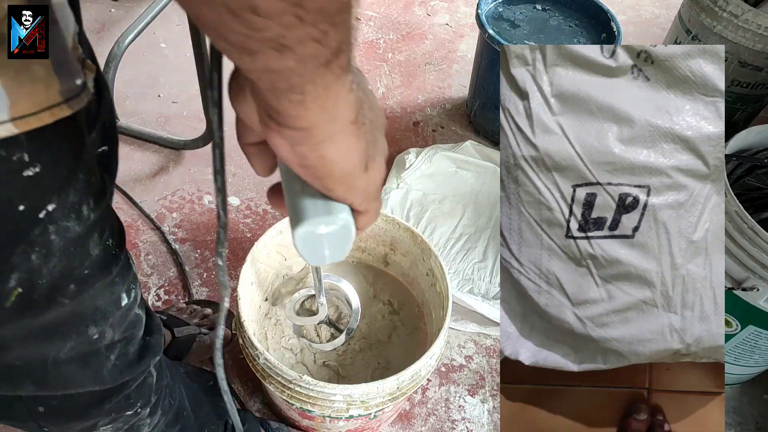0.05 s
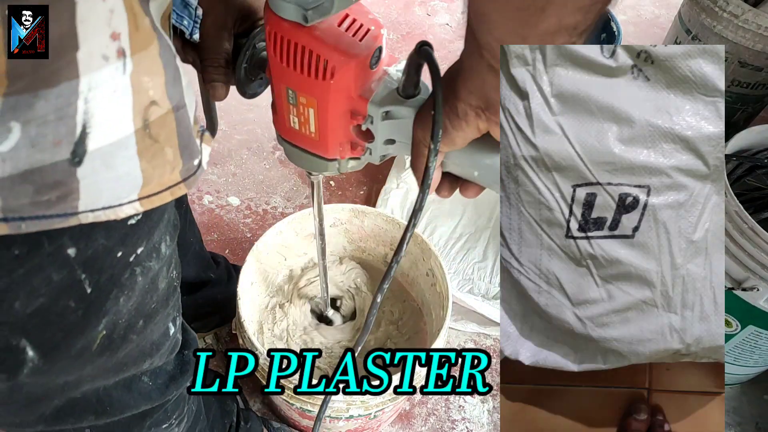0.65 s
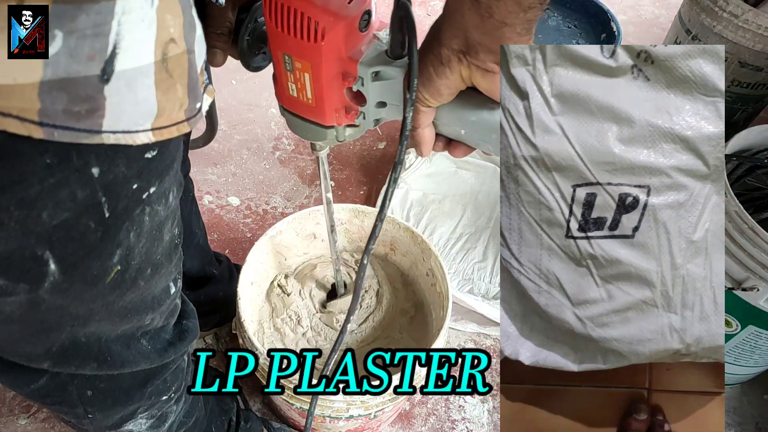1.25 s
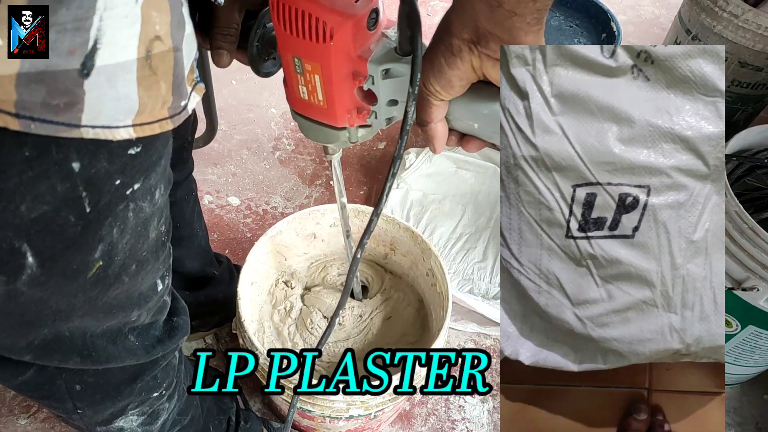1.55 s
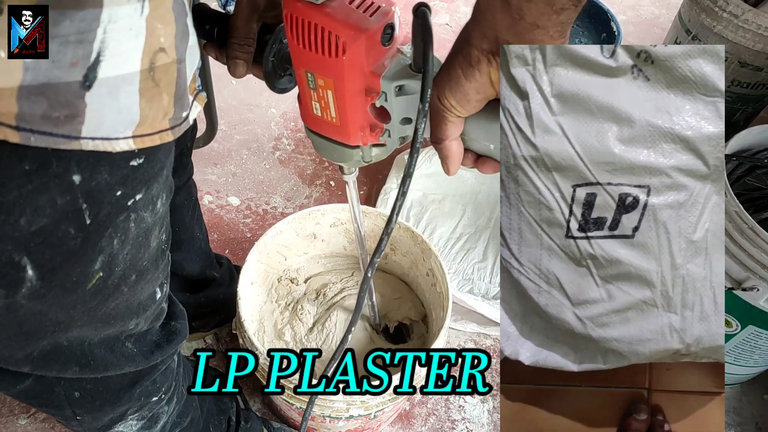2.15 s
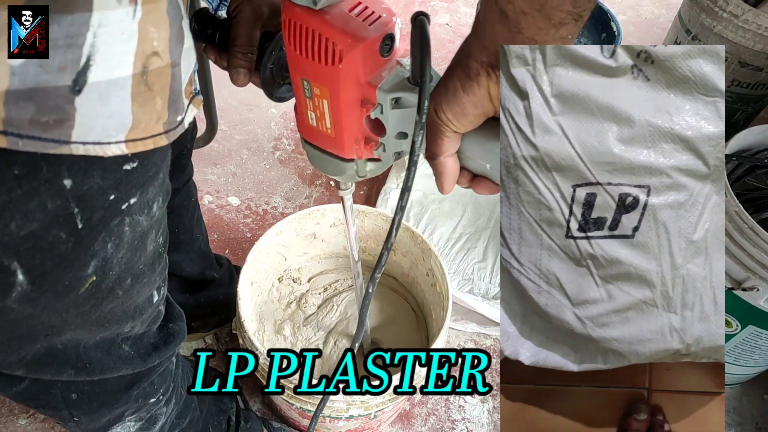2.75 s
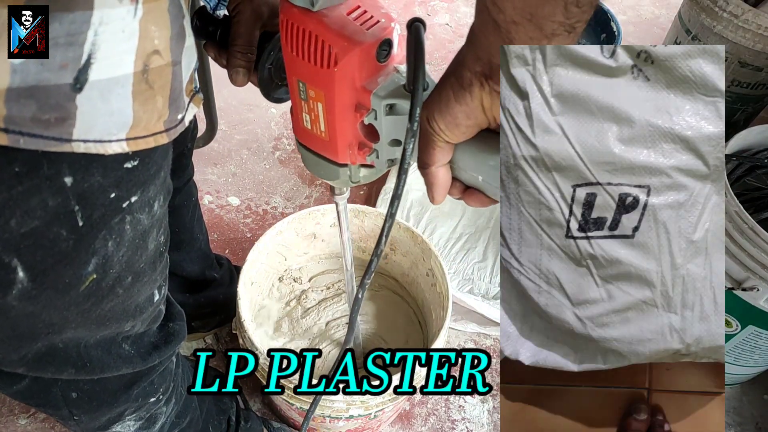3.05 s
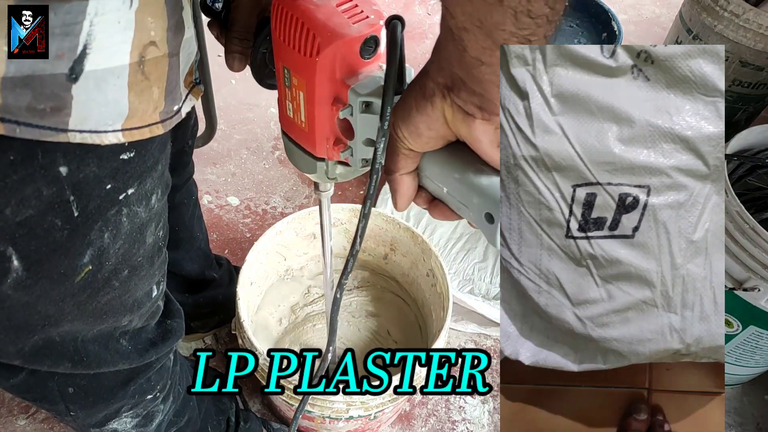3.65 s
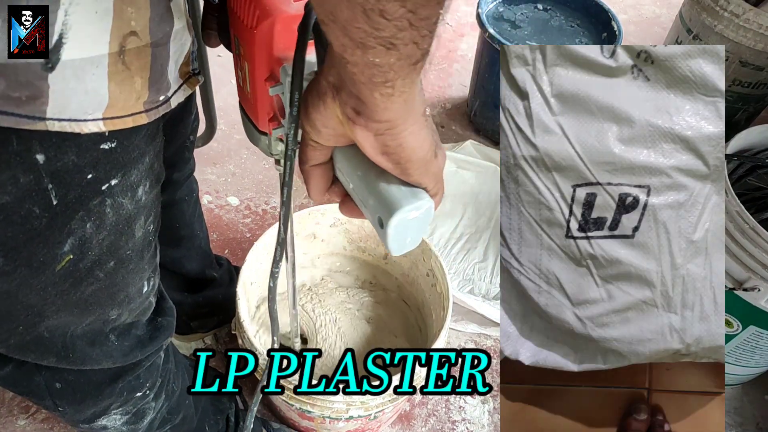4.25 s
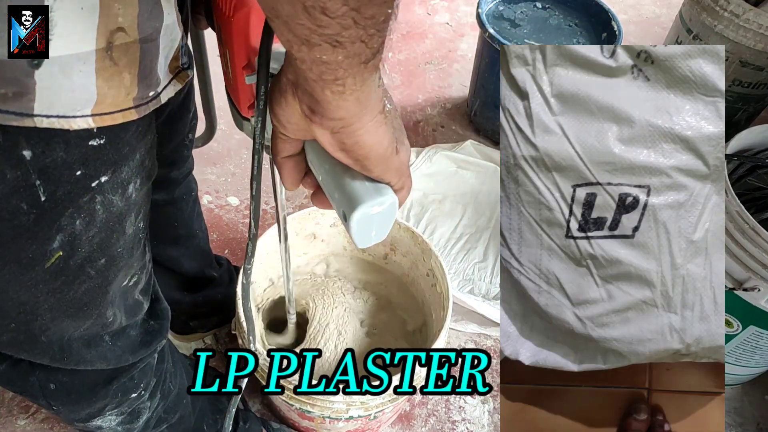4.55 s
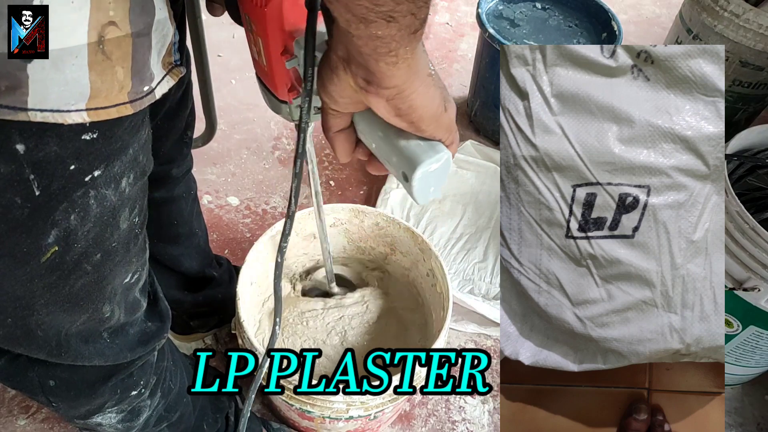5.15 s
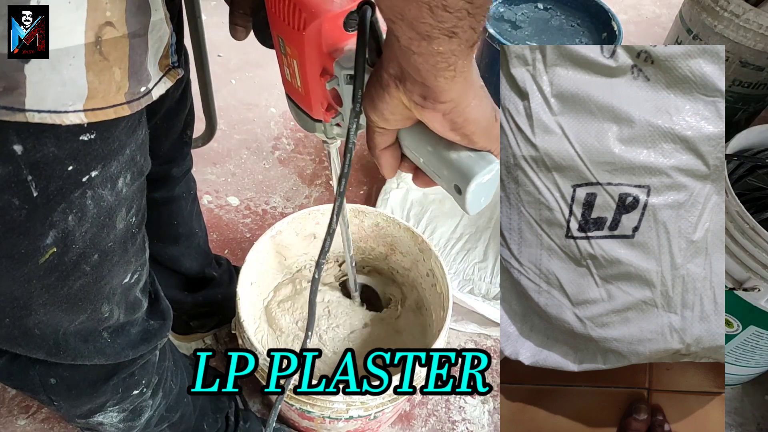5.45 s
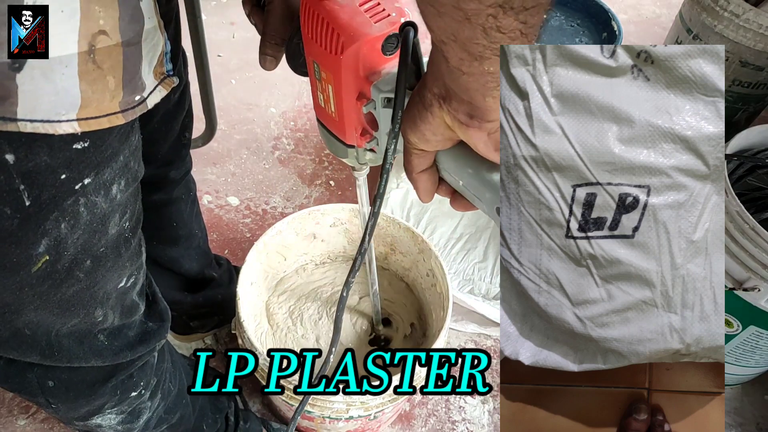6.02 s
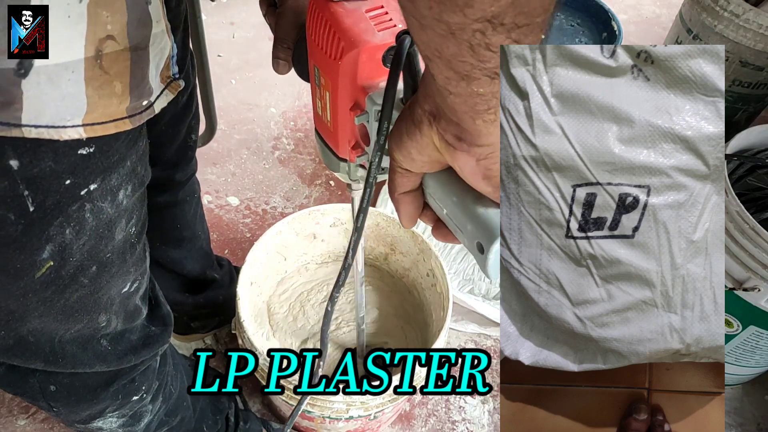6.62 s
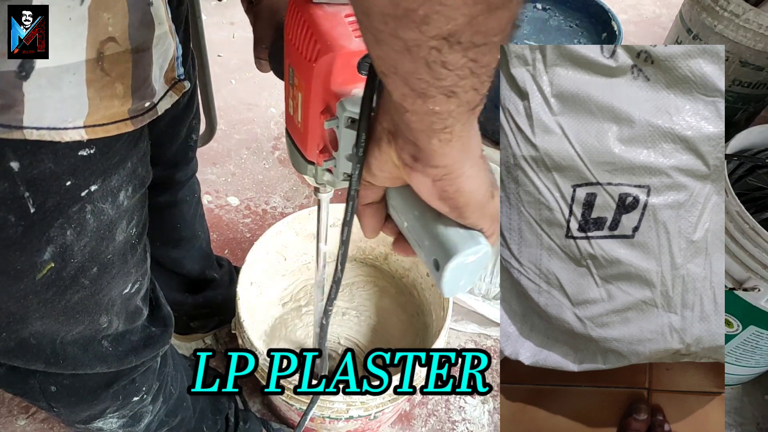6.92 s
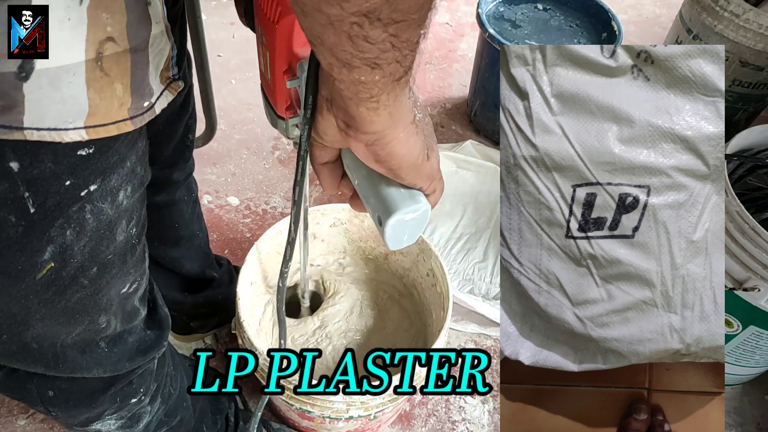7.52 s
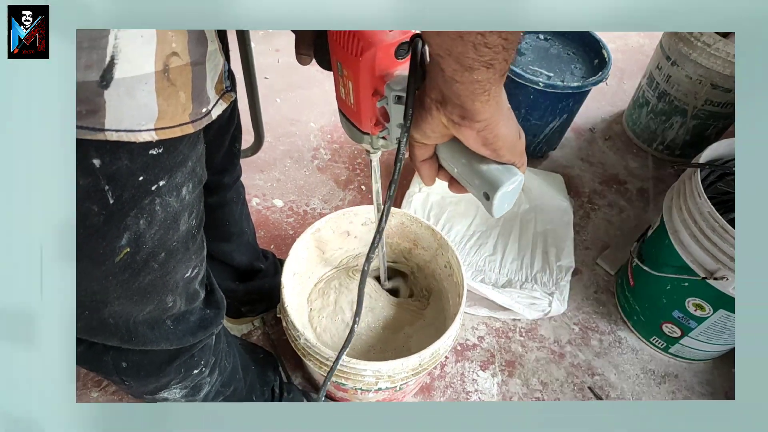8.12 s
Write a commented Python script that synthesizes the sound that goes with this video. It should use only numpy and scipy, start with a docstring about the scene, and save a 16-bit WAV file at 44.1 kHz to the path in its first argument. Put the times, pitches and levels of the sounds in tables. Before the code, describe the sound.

A trigger clicks and a hand-held electric mixer blips, coasts for a moment, then spins up to full speed. It keeps running with a high, wavering whine, howling and rattling gears and a steady hiss, dipping slightly in pitch under load. Underneath, the paddle churns thick plaster with soft squelches, a few gulps and dull thumps against the plastic bucket. It is heard close up in a small, hard room.

```python
"""Electric paddle mixer stirring thick plaster in a plastic bucket, small hard room.
The trigger clicks; the motor blips, coasts, then runs up to about 420 rev/s.
Two gear stages howl and rattle, the armature slots whine, fan and brushes hiss.
The paddle squelches at about 10 rev/s. Air pockets collapse behind it,
and it thumps whenever it works near the bucket wall."""
import sys
import numpy as np
from scipy import signal
from scipy.fft import rfft, irfft
from scipy.io import wavfile
from scipy.ndimage import uniform_filter1d

SR = 44100
rng = np.random.default_rng(int(sys.argv[2]) if len(sys.argv) > 2 else 0)


def log_audio(samples):
    """Write samples as a 16-bit WAV file to the path given in sys.argv[1]."""
    # one column per channel
    frames = np.atleast_2d(samples).T
    # limit to full scale, then quantise
    limited = np.clip(frames, -1, 1)
    pcm = np.round(limited * 32767).astype(np.int16)
    wavfile.write(sys.argv[1], SR, pcm)


N = 365148
TIME = np.arange(N) / SR

# Likeness of left and right noise: f/Hz, correlation
COHERENCE = [(30, 0.52), (200, 0.89), (500, 0.84), (1100, 0.61), (2200, 0.37), (4500, 0.26), (8000, 0.12),
             (15000, 0.036)]
# Room background spectrum: f/Hz, relative level/dB
ROOM_SPECTRUM = [(30, 7), (120, -11), (350, -1), (1000, -14), (3000, -13.5), (7000, -13), (15000, -24)]
# Grip knocks and switch snaps: t/s, level/dB, low-pass f/Hz
TRIGGER_CLICKS = [(0.023, -56, 550), (0.087, -58.5, 2300), (0.268, -38, 14100), (0.2776, -27, 13900)]
# Plaster drag: t/s, armature speed lost/(rev/s)
SPEED_SAG = [(1.28, 0), (1.44, -1.0), (1.76, 7.4), (2.08, 10.0), (3.04, 10.3), (4.32, 6.0), (5.04, 0.2),
             (5.2, 2.6), (5.76, 17.6), (6.0, 20.1), (6.32, 12.6), (6.8, 5.4), (7.2, 9.7), (7.6, 6.0),
             (8.28, 12.0)]
# Housing response to gear harmonics: f/Hz, level/dB
HOUSING_RESPONSE = [(750, -47), (980, -42), (1300, -33), (1550, -28), (1780, -26), (1960, -30), (2150, -39),
                    (2450, -33.5), (2940, -35), (3900, -35.5), (4500, -46), (4900, -44), (6800, -42),
                    (9000, -48)]
# Mesh harmonic 3 ringing the gearbox as the tool moves: t/s, left level/dB, right level/dB
HOWL_LEVELS = [(1.1, -26.5, -24.5), (1.74, -29.5, -30.5), (2.38, -23, -20.5), (2.98, -27.5, -32.5),
               (3.18, -23, -27), (4.14, -28, -32), (4.22, -38.0, -25), (4.46, -26, -26), (5.02, -50, -26.7),
               (5.1, -33, -27), (5.66, -22, -27), (5.98, -40.7, -35), (6.06, -29, -32), (6.46, -24, -27),
               (6.7, -36, -29.5), (7.1, -29, -34), (7.66, -63, -26), (7.82, -26, -33), (8.28, -26.5, -29)]
# Mesh harmonic 4, a thinner metallic ring: t/s, level/dB
RING_LEVELS = [(1.0, -27), (1.2, -34), (1.45, -26.5), (2.0, -36), (3.2, -27.5), (3.9, -34.5), (4.4, -34),
               (5.9, -34.5), (6.7, -32), (7.2, -36), (8.28, -30)]
# Armature unbalance hum: t/s, level/dB
UNBALANCE_LEVELS = [(1.1, -48), (2.4, -43.5), (3.1, -54), (3.55, -40.5), (4.3, -48), (5.7, -48.5),
                    (7.2, -44.5), (8.28, -49)]
# Slot tone as the tool moves: t/s, left level/dB, right level/dB
WHINE_LEVELS = [(1.1, -33, -33), (2.54, -23, -30), (3.25, -33, -32), (3.74, -21, -29), (4.3, -25, -23.5),
                (4.85, -19.5, -28.5), (5.26, -25, -21), (5.66, -30, -35), (5.98, -38, -27),
                (6.38, -28, -23.5), (6.54, -39, -25), (7.02, -19, -28.1), (7.26, -28.2, -25.4),
                (7.66, -20.5, -22.5), (7.82, -33, -19.5), (8.28, -29, -46)]
# Pinion and commutator lines: multiple of armature speed, level/dB
ARMATURE_LINES = [(2, -45), (7, -43), (24, -36.5)]
# Tooth rattle spectrum: f/Hz, relative level/dB
RATTLE_SPECTRUM = [(100, -19.5), (250, -15.5), (420, -10), (570, -8), (760, -4.5), (900, -5.5), (1500, 3.5),
                   (2700, 1), (4000, -4.5), (6000, -16), (15000, -28)]
# Gearbox and bucket resonances: f/Hz, width/Hz, boost/dB
BODY_PEAKS = [(372, 40, 3), (427, 24, 3.5), (469, 27, 8), (633.6, 13.5, 5.5), (663, 38, 2.5),
              (830, 17, 10.5), (933, 49, 12.5), (1042, 35, 7.5), (1176, 35, 4), (1274, 7.7, 10),
              (2870, 440, 3)]
# Fan and brush spectrum: f/Hz, relative level/dB
HISS_SPECTRUM = [(200, -27), (800, -4), (2000, -10), (3800, 0), (5500, 0), (7000, -1.5), (9800, -2.5),
                 (12000, -5), (15500, -7)]
# Rattle and hiss as the tool nears or recedes: t/s, gain/dB
NEARNESS_GAIN = [(1.2, 0.3), (2.3, 1), (3.7, 0.95), (4.6, -.3), (6.7, 0.6), (8.28, -.4)]
# Churned paste spectrum: f/Hz, relative level/dB
SQUELCH_SPECTRUM = [(30, -27), (70, -28), (130, -5.5), (175, -11), (240, 1), (350, 0.5), (500, -9.5),
                    (900, -49), (3000, -19)]
# Air pockets, one per paddle turn: start t/s, end t/s, first level/dB, last level/dB
GULP_BOUTS = [(0.859, 0.89, -26, -27), (0.911, 0.95, -23, -25), (2.364, 2.4, -26, -28),
              (4.416, 4.75, -29, -27), (6.099, 6.83, -26.5, -31), (7.783, 7.82, -30, -32)]
# Blows near the wall, one per paddle turn: start t/s, end t/s, first level/dB, last level/dB
THUMP_BOUTS = [(1.475, 1.72, -32, -43), (4.121, 4.16, -36, -41), (4.229, 4.95, -30, -38),
               (5.103, 5.34, -32.5, -36), (5.49, 5.53, -38, -43), (5.698, 5.94, -34, -46),
               (7.392, 7.53, -36, -37), (7.793, 8.23, -32, -36)]
# Modes of the full bucket: f/Hz, level/dB, T60/s
BUCKET_MODES = [(92, -13, 0.15), (127.7, -1, 0.14), (143.5, -1, 0.16), (249, 1, 0.083)]

START_S, RELEASE_S, RESTART_S = .263, .437, .781
FREE_HZ, RINGING_HZ = 420, 370  # armature speeds: unloaded; below which howl, ring and whine fade
# Cycles per armature turn
MESH_PER_TURN, LAYSHAFT_PER_TURN, PADDLE_PER_TURN, SLOTS = 49 / 41, 7 / 41, 49 / 41 / 48, 12
# Level lost per octave of lower speed
HOWL_DB_OCT, RING_DB_OCT, HUM_DB_OCT, WHINE_DB_OCT = 35, 17.5, 32.5, 41
TEETH_DB_OCT, HISS_DB_OCT, SQUELCH_DB_OCT = 10, 12.5, 7


def gain_of(db):
    return 10 ** (np.asarray(db) / 20)


def unit_rms(x):
    return x / np.sqrt(np.mean(abs(x) ** 2) + 1e-20)


def at_hz(points, hz):
    """Table lookup on a log-frequency axis."""
    f, value = np.transpose(points)
    return np.interp(np.log(hz + 1), np.log(f + 1), value)


def curves(rows):
    """Table columns interpolated over TIME."""
    times_s, *columns = np.transpose(rows)
    return np.array([np.interp(TIME, times_s, c) for c in columns])


def add(mix, start_s, sound):
    part = mix[:, round(start_s * SR):][:, :sound.shape[-1]]
    part += sound[..., :part.shape[1]]


def wander(corner_hz):
    """Low-passed random drift, rms about 1."""
    hz = np.fft.rfftfreq(4096, TIME[-1] / 4096)
    slow = irfft(rfft(rng.standard_normal(4096)) / (1 + (hz / corner_hz) ** 2))
    return np.interp(TIME, np.linspace(0, TIME[-1], len(slow)), unit_rms(slow))


def noise(spectrum, peaks=(), skew_s=.0001):
    """Coloured stereo noise, rms 1; channels alike in the bass, unrelated in the treble."""
    hz = np.fft.rfftfreq(N, 1 / SR)
    left, other = rfft(rng.standard_normal((2, N)))
    alike = at_hz(COHERENCE, hz)
    right = (alike * left + np.sqrt(1 - alike ** 2) * other) * np.exp(2j * np.pi * hz * skew_s)
    peaks_db = sum(db / (1 + (2 * (hz - f) / width) ** 2) for f, width, db in peaks)
    return unit_rms(irfft(np.array([left, right]) * gain_of(at_hz(spectrum, hz) + peaks_db), N))


def tone(phase, echo_share, fade_hz=3.3, skew_s=.00006):
    """Stereo tone: direct part skewed in time, reflections fading as the tool moves."""
    cos, sin = np.cos(phase), np.sin(phase)
    direct = np.array([cos, np.cos(phase + np.gradient(phase) * SR * skew_s)])
    echo = np.array([wander(fade_hz) * cos + wander(fade_hz) * sin for _ in range(2)])
    return np.sqrt(2 * (1 - echo_share)) * direct + np.sqrt(echo_share) * echo


def room(x, wet_share, t60_s=.3):
    """Hard walls smear glides and make wobbling tones flutter."""
    t = np.arange(SR // 3) / SR
    tail = rng.standard_normal((2, len(t))) * gain_of(-60 * t / t60_s)
    wet = signal.oaconvolve(x, tail / np.linalg.norm(tail[0]), axes=1)[:, :N]
    return np.sqrt(1 - wet_share) * x + np.sqrt(wet_share) * wet


def octaves_below(speed_hz, full_hz=FREE_HZ):
    return np.log2(full_hz / np.clip(speed_hz, full_hz / 10, full_hz))


def each_turn(bouts, angle):
    """Yields t/s, level/dB: one stroke per paddle turn through each bout."""
    turns = angle * PADDLE_PER_TURN / (2 * np.pi)
    for start_s, end_s, first_db, last_db in bouts:
        first_turn, end_turn = np.interp([start_s, end_s], TIME, turns)
        times_s = np.interp(np.arange(first_turn, end_turn), turns, TIME)
        yield from zip(times_s, np.linspace(first_db, last_db, len(times_s)))


def room_tone(level_db=-63.5):
    """Faint steady background."""
    return gain_of(level_db) * noise(ROOM_SPECTRUM)


def trigger():
    """Two soft grip knocks, two sharp switch snaps, each with a short room tail."""
    out, t = np.zeros((2, N)), np.arange(SR // 4) / SR
    snap = noise([(200, -20), (900, -11), (3000, -3.5), (6000, -14), (15000, -18)])
    decay = np.exp(-t / .002) + .4 * np.exp(-t / .044)
    for start_s, db, cutoff_hz in TRIGGER_CLICKS:
        burst = snap[:, round(start_s * SR):][:, :len(t)]
        dulled = signal.lfilter(*signal.butter(2, cutoff_hz, fs=SR), burst)
        add(out, start_s, gain_of(db) * decay * unit_rms(dulled))
    return out


def motor(run_up_s=.703, start_kick=7.178, coast_s=.692):
    """Series motor: fast run-up, slow coast. Returns unloaded speed/Hz and pull, 0-1."""
    def run_up(from_hz, elapsed_s):
        deficit = 1 - from_hz / FREE_HZ
        decay = np.exp(-np.maximum(elapsed_s, 0) / run_up_s)
        return FREE_HZ * (1 - deficit * decay / (1 + start_kick * deficit * (1 - decay)))

    def coast(t):
        return run_up(0, RELEASE_S - START_S) * np.exp(-(t - RELEASE_S) / coast_s)

    coasting = (TIME >= RELEASE_S) & (TIME < RESTART_S)
    blip_hz = run_up(0, TIME - START_S)
    restart_hz = run_up(coast(RESTART_S), TIME - RESTART_S)
    speed_hz = np.select([TIME < RELEASE_S, coasting], [blip_hz, coast(TIME)], restart_hz)
    return speed_hz, uniform_filter1d((1 - speed_hz / FREE_HZ) * ~coasting, size=600)


def slackness(speed_hz, full_slack_hz_per_s=300):
    """Teeth go slack as the motor slows, 0-1."""
    slowing_hz_per_s = -np.gradient(speed_hz) * SR
    return uniform_filter1d(np.clip(slowing_hz_per_s / full_slack_hz_per_s, 0, 1), size=2000)


def bite(peak_s=.83, half_width_s=.053):
    """Extra load as the paddle tears the standing plaster loose, 0-1."""
    return np.exp(-((TIME - peak_s) / half_width_s) ** 2)


def gears(angle, speed_hz, sag_hz, backlash_rad=.059):
    """Output mesh harmonics with sidebands from the eccentric layshaft; mesh and unbalance hum."""
    mesh, layshaft = angle * MESH_PER_TURN, angle * LAYSHAFT_PER_TURN
    slack = slackness(speed_hz)  # slack teeth knock louder, duller, unevenly
    loose_mesh = mesh + backlash_rad * slack * wander(45)
    stack = np.zeros((2, N))
    stack_db = -1 - TEETH_DB_OCT * octaves_below(speed_hz) + 5.5 * bite()
    for k in (2, 5, 6, 7, 8, 9, 10, 11, 12, 13, 14, 17):
        db = at_hz(HOUSING_RESPONSE, k * speed_hz * MESH_PER_TURN) + stack_db + slack * (8 - .7 * k)
        runout = 1 + .41 * np.cos(layshaft + 2 * np.pi * rng.random())
        phase = k * loose_mesh + 2 * np.pi * rng.random()
        stack += gain_of(db) * runout * tone(phase, echo_share=.29, fade_hz=5.1)
    slow_oct = octaves_below(speed_hz, RINGING_HZ)
    howl_gain = gain_of(curves(HOWL_LEVELS) - HOWL_DB_OCT * slow_oct) * (1 + .17 * np.cos(layshaft))
    howl = howl_gain * tone(3 * mesh, echo_share=.19, fade_hz=15)
    ring_gain = gain_of(curves(RING_LEVELS) - RING_DB_OCT * slow_oct) * (1 + .5 * np.sin(layshaft))
    ring = ring_gain * tone(4 * loose_mesh, echo_share=.35, fade_hz=14)
    hum = gain_of(curves(UNBALANCE_LEVELS)) * tone(angle, echo_share=.13)
    hum += gain_of(-53.5 + .75 * sag_hz) * tone(mesh, echo_share=.46)
    return room(stack, wet_share=.25) + howl + ring + gain_of(-HUM_DB_OCT * slow_oct) * hum


def armature(angle, speed_hz, pull, flare_hz=2680, flare_width_hz=860):
    """Slot whine, coarse under pull, flaring at a housing resonance; pinion and commutator lines."""
    chatter_rad = (.35 + 1.8 * pull) * wander(110)
    blade_load = 1 + .14 * np.cos(2 * angle * PADDLE_PER_TURN)
    slots = blade_load * tone(SLOTS * angle + chatter_rad, echo_share=.16, fade_hz=25)
    whine = gain_of(curves(WHINE_LEVELS) - WHINE_DB_OCT * octaves_below(speed_hz, RINGING_HZ)) * slots
    resonance = np.exp(-((SLOTS * speed_hz - flare_hz) / flare_width_hz) ** 2)
    flare = gain_of(-25 + 2.5 * bite()) * (.1 + pull) * resonance * slots
    lines = sum(gain_of(db) * tone(k * angle, echo_share=.19, fade_hz=1.9) for k, db in ARMATURE_LINES)
    return whine + room(flare, wet_share=.44) + gain_of(-HISS_DB_OCT * octaves_below(speed_hz)) * lines


def rattle_and_hiss(angle, speed_hz):
    """Teeth rattle, fan and brushes hiss; both grow with speed and pulse with mesh and paddle load."""
    teeth, load = np.cos(angle * MESH_PER_TURN), np.cos(angle * PADDLE_PER_TURN)
    flutter, slow_oct = wander(23), octaves_below(speed_hz)
    rattle_db = -21.5 - TEETH_DB_OCT * slow_oct + 1.2 * slackness(speed_hz) + 3 * bite()
    rattle_db += .7 * teeth + .12 * load + .5 * flutter
    rattle = noise(RATTLE_SPECTRUM, BODY_PEAKS) * gain_of(rattle_db)
    hiss_db = -18.5 - HISS_DB_OCT * slow_oct + .4 * teeth + .064 * load + .35 * flutter
    hiss = noise(HISS_SPECTRUM) * gain_of(hiss_db + .5 * wander(200))
    return gain_of(curves(NEARNESS_GAIN)) * (rattle + hiss)


def squelch(angle, speed_hz, smoothing_db_per_s=1):
    """The paddle tears the paste once a turn; quieter as the plaster is worked smooth."""
    stroke_db = 1.1 * np.cos(angle * PADDLE_PER_TURN) + .57 * wander(6.7)
    churn_db = -41 - SQUELCH_DB_OCT * octaves_below(speed_hz) - smoothing_db_per_s * TIME
    return noise(SQUELCH_SPECTRUM) * gain_of(churn_db + stroke_db)


def gulps(angle, pocket_hz=349.4, t60_s=.12, rise_per_s=.5):
    """Air pockets ring briefly, rising in pitch as the paste closes them."""
    out, t = np.zeros((2, N)), np.arange(SR // 5) / SR
    swell = (1 - np.exp(-(t / .0059) ** 2)) * gain_of(-60 * t / t60_s)
    for start_s, db in each_turn(GULP_BOUTS, angle):
        hz = pocket_hz * (1 + .033 * rng.standard_normal()) * (1 + rise_per_s * t)
        add(out, start_s, gain_of(db) * swell * np.sin(2 * np.pi * np.cumsum(hz) / SR))
    return out


def thumps(angle, attack_s=.014):
    """Paddle blows ring the bucket; soft paste spreads each attack."""
    out, t = np.zeros((2, N)), np.arange(SR // 4) / SR
    push = 1 - np.exp(-(t / attack_s) ** 2)
    for start_s, blow_db in each_turn(THUMP_BOUTS, angle):
        for mode_hz, mode_db, t60_s in BUCKET_MODES:
            hz = mode_hz * (1 + .069 * rng.standard_normal())
            envelope = push * gain_of(blow_db + mode_db - 60 * t / t60_s)
            add(out, start_s, envelope * np.sin(2 * np.pi * hz * t))
    return out


def scene():
    """One armature angle drives mixer and plaster; each paddle stroke drags on it slightly."""
    unloaded_hz, pull = motor()
    sag_hz = curves(SPEED_SAG)[0]
    speed_hz = unloaded_hz - sag_hz
    stroke = np.cos(2 * np.pi * np.cumsum(speed_hz) * PADDLE_PER_TURN / SR)
    ripple = 1 + .000743 * wander(14.26) + .0015 * stroke
    angle = 2 * np.pi * np.cumsum(speed_hz * ripple) / SR
    running = np.clip((TIME - START_S) / .013, 0, 1)
    mixer = gears(angle, speed_hz, sag_hz) + armature(angle, speed_hz, pull)
    mixer += rattle_and_hiss(angle, speed_hz)
    plaster = squelch(angle, speed_hz) + thumps(angle) + gulps(angle)
    return running * (mixer + plaster) + trigger() + room_tone()


def record(dry, cutoff_hz=15500):
    """Low-pass band limit."""
    taps = signal.firwin(511, cutoff_hz, window=("kaiser", 9), fs=SR)
    return signal.oaconvolve(dry, taps[None], "same")


dry = scene()
out = record(dry)
log_audio(out)
```